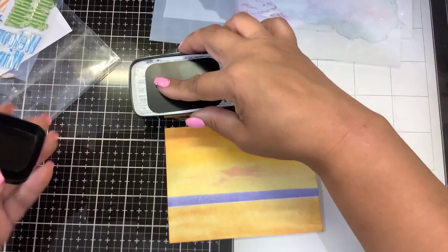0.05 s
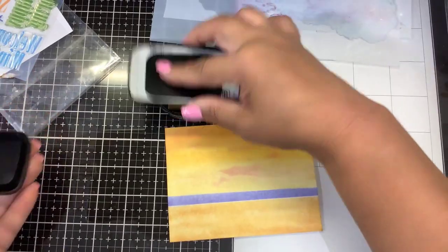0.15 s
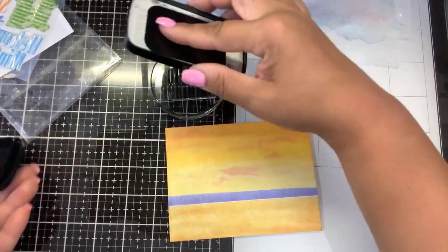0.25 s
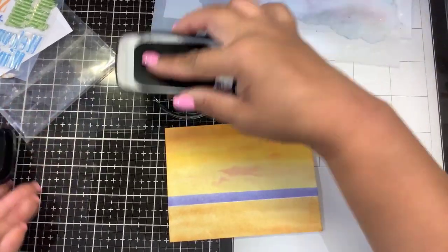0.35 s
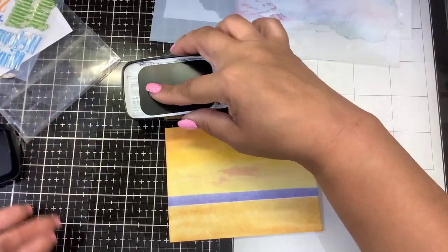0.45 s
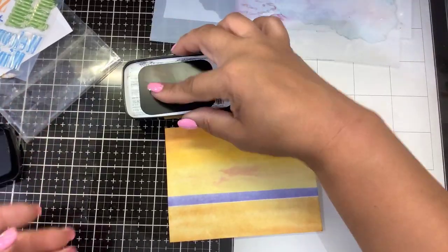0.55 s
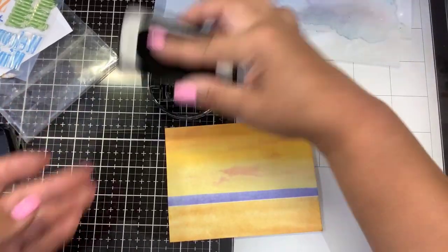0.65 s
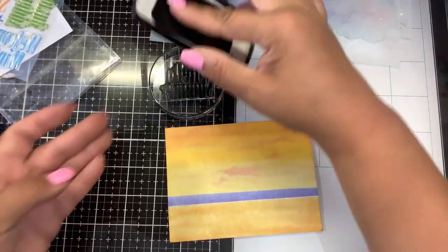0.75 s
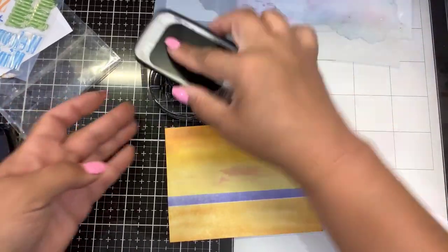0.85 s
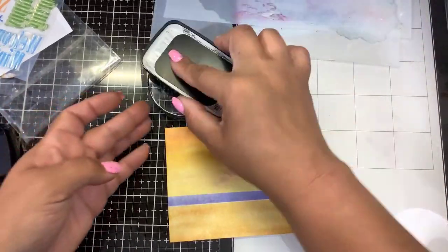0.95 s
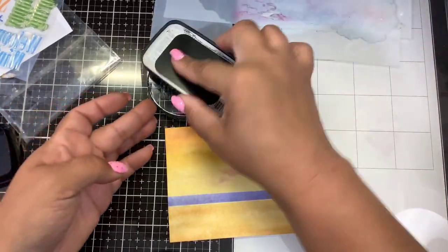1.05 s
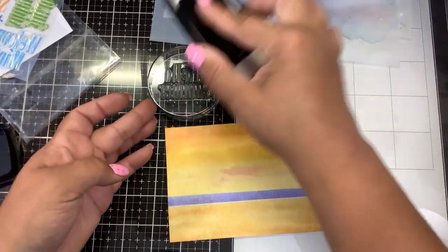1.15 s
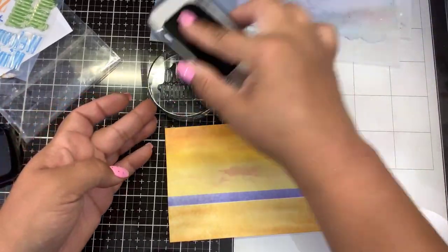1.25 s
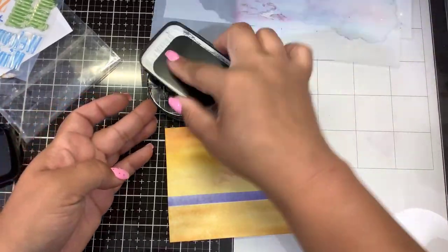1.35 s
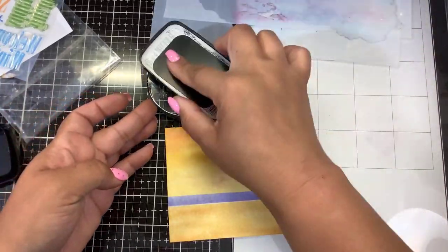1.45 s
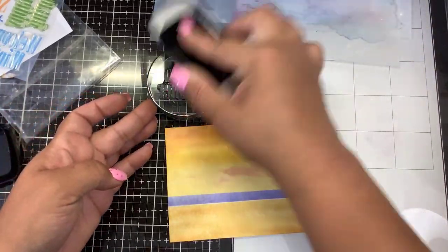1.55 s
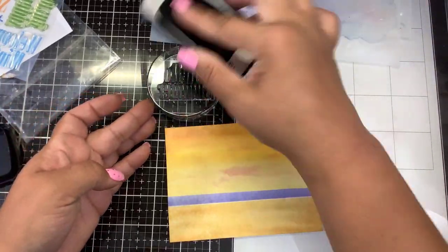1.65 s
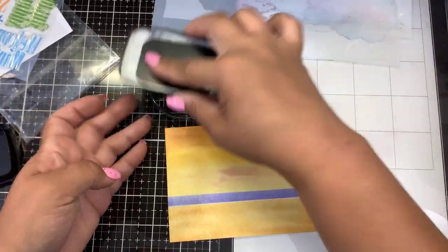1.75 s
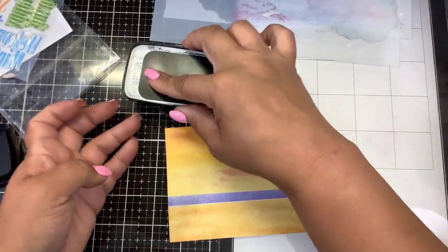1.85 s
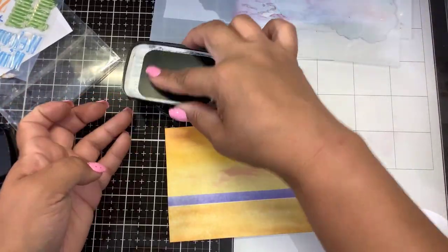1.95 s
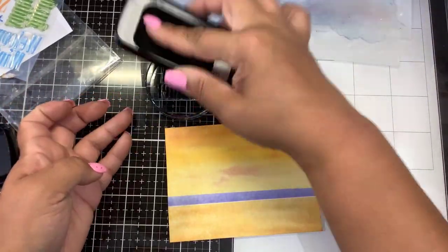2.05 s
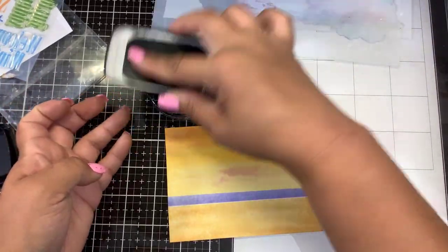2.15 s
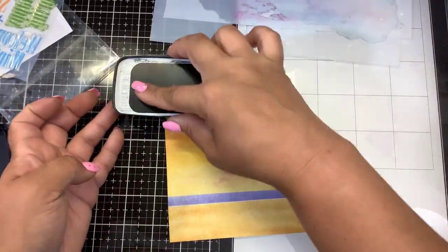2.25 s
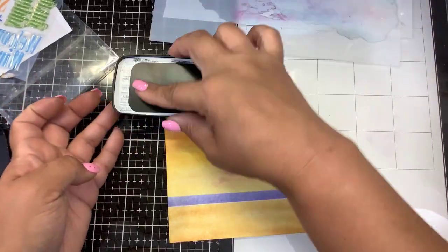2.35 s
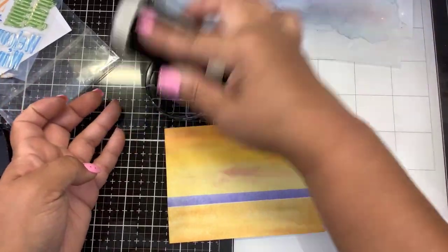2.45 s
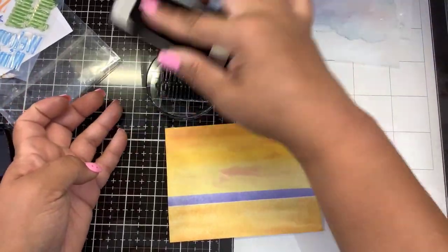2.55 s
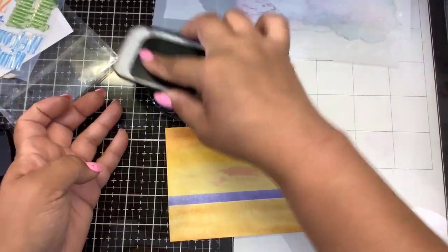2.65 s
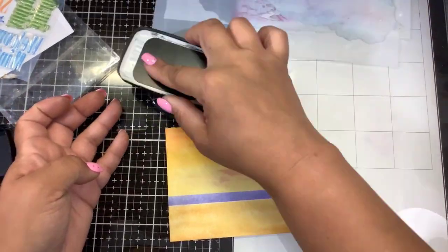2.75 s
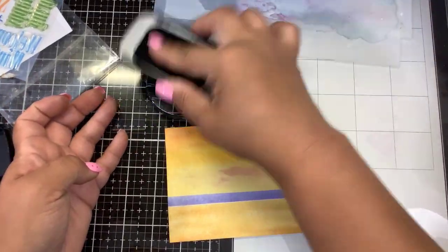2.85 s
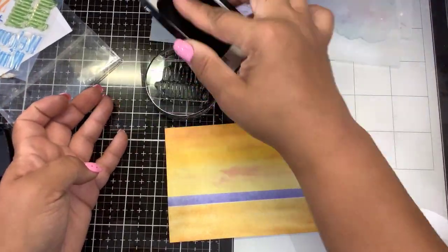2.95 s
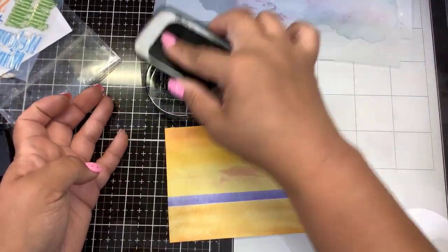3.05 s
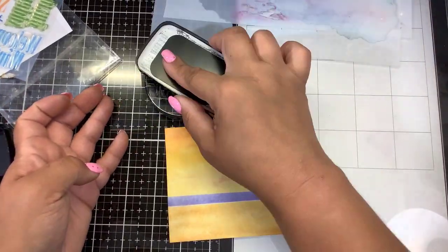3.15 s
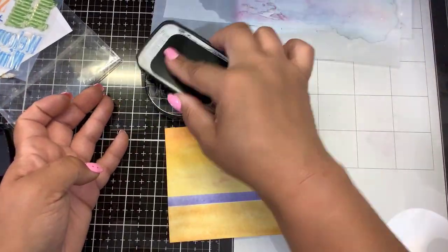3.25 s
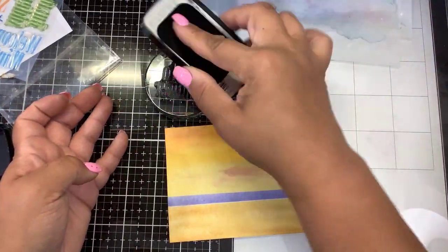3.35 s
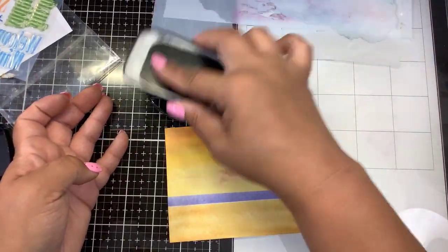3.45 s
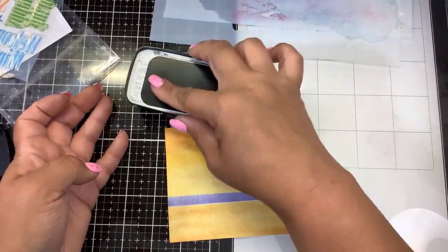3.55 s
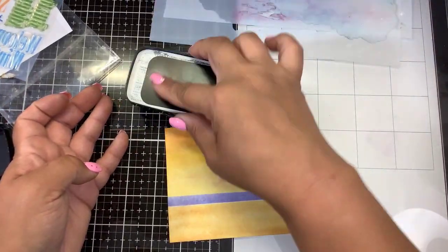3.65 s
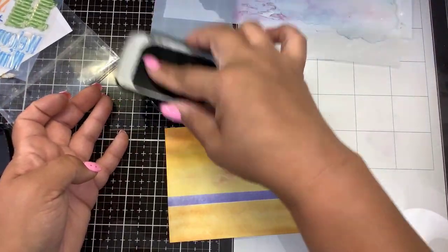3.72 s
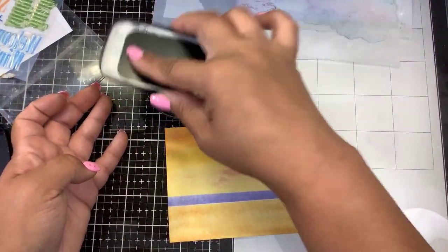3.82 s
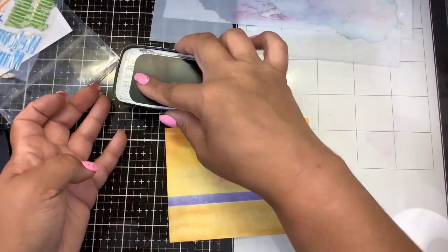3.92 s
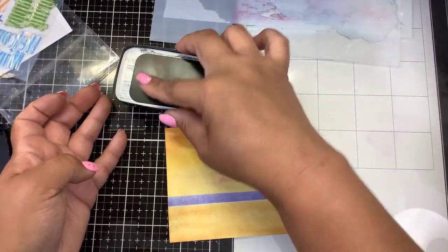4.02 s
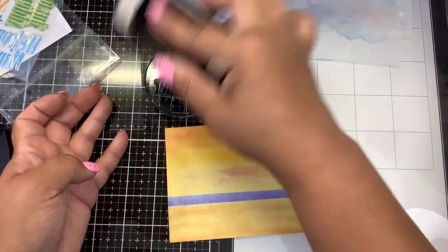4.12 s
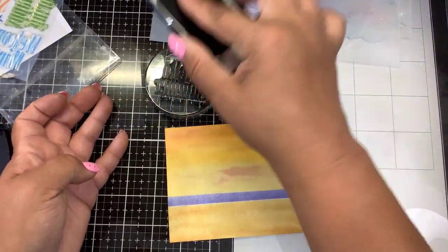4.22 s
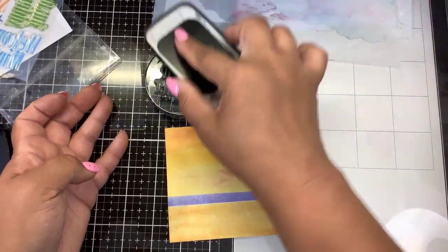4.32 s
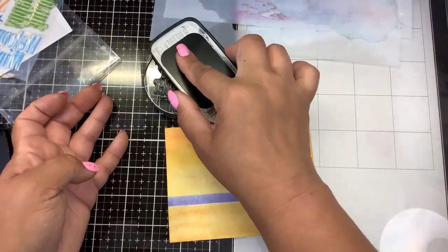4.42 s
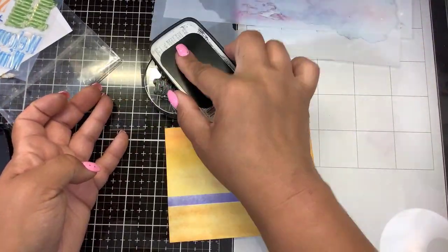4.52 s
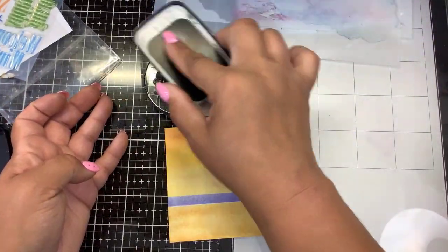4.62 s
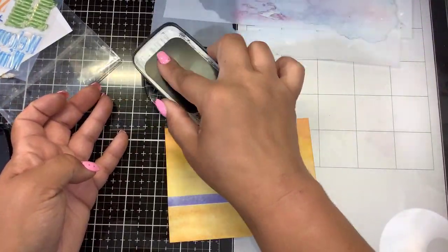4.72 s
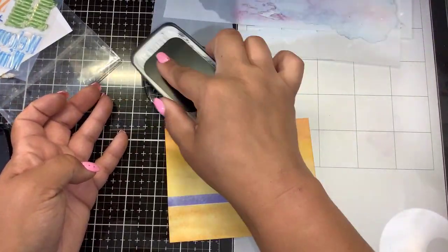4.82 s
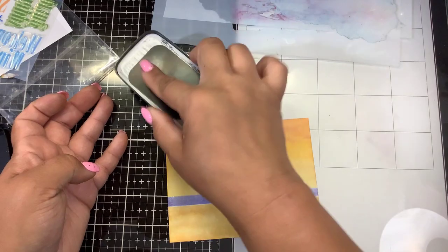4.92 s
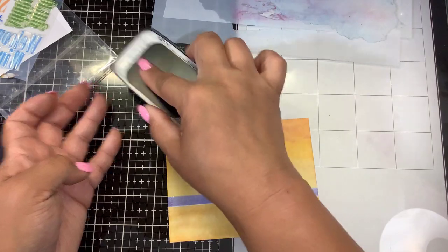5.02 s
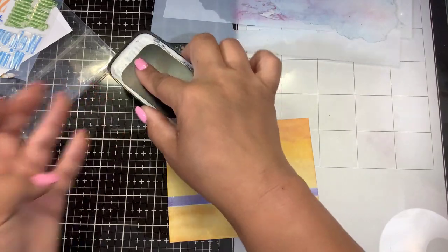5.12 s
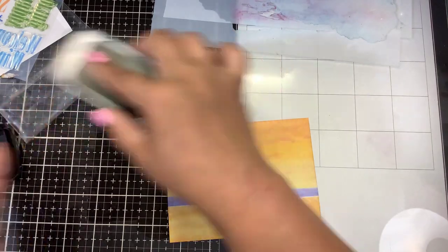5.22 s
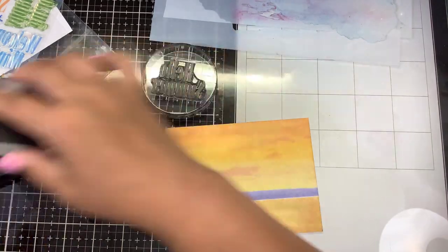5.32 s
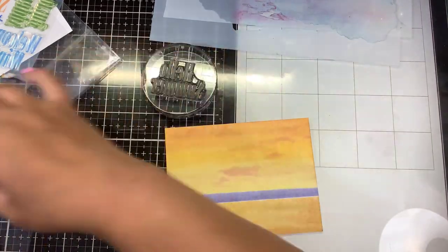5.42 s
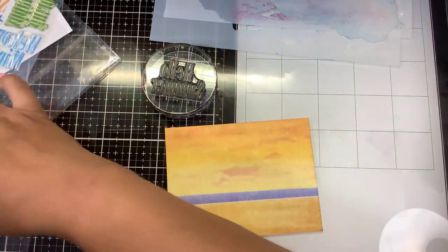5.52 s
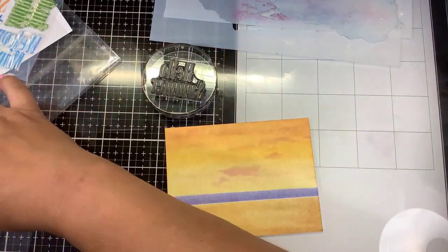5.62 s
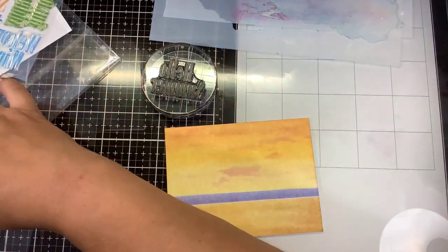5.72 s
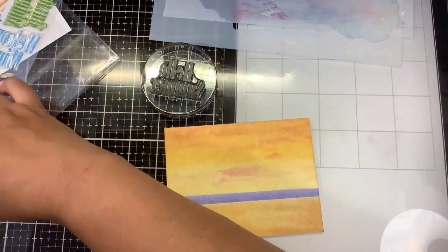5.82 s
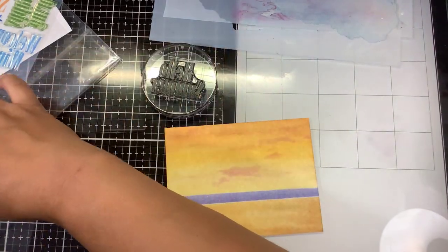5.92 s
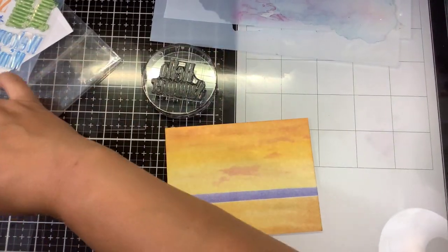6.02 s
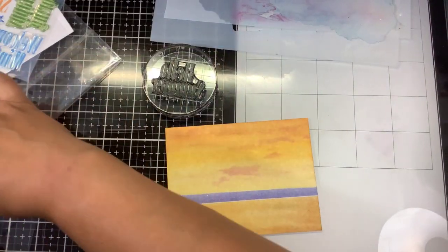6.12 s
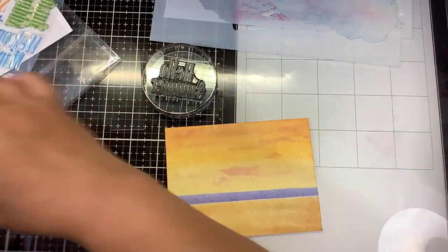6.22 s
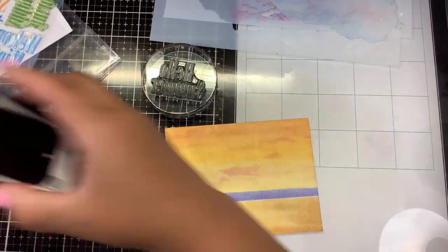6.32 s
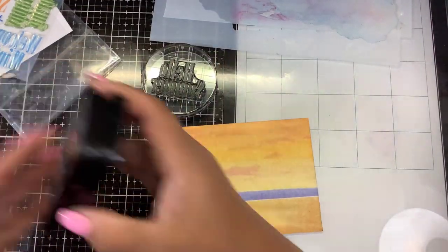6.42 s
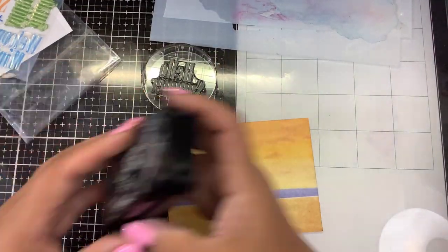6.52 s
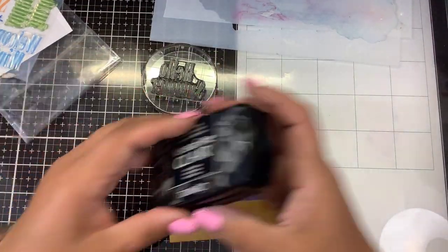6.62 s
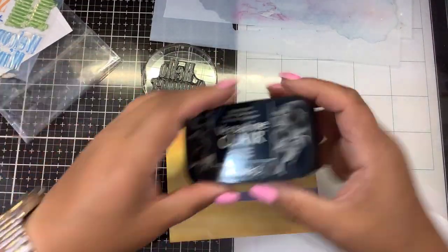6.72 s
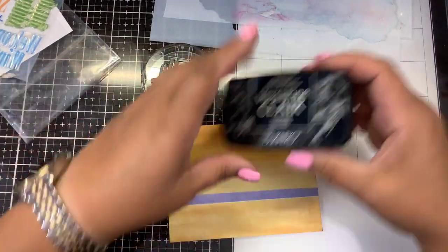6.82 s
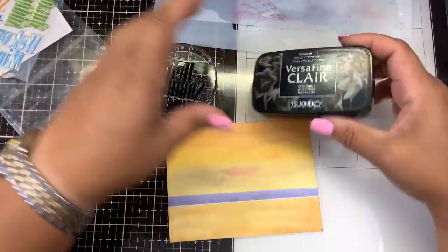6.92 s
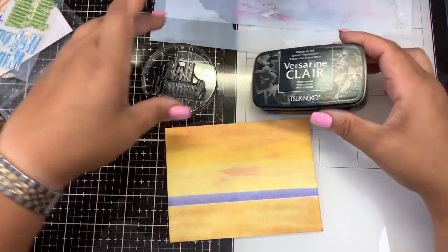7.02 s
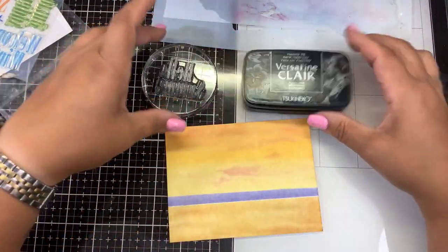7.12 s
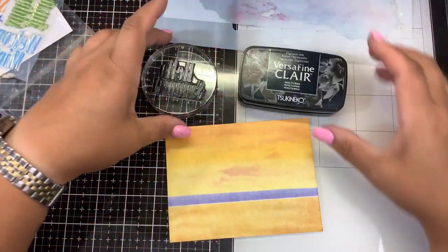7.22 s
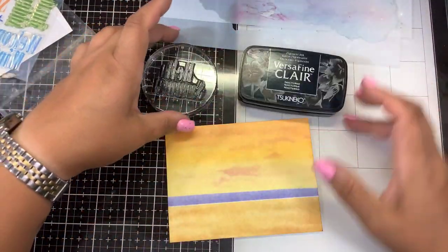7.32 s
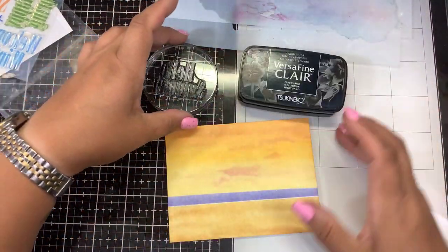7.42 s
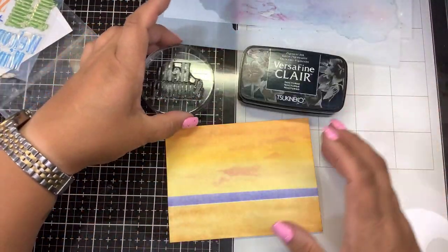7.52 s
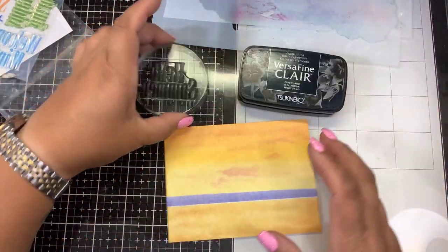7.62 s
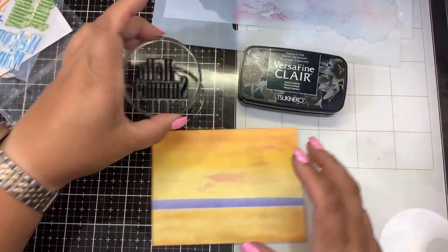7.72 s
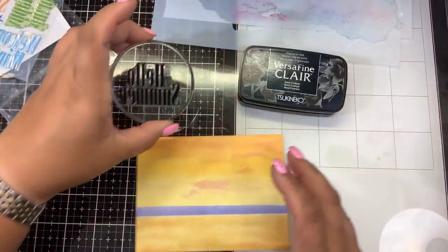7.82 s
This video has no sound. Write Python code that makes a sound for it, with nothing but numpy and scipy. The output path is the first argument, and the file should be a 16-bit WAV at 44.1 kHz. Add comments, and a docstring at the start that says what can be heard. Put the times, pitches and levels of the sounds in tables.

```python
"""A plastic ink pad is dabbed onto a clear stamp on an acrylic block, on a craft table in a small quiet room.
The lid clacks among the first dabs. For five seconds, dab after dab thuds through the table top,
the rim of the case clicks, and the tacky ink peels off as the pad lifts.
Then the lid is picked up, with clicks, knocks and scuffs of hollow plastic.
At seven seconds the closed pad is set down and rattles to rest."""
import sys
import numpy as np
from scipy import signal
from scipy.fft import rfft, irfft, next_fast_len
from scipy.io import wavfile
from scipy.ndimage import uniform_filter1d

SR = 44100
rng = np.random.default_rng(int(sys.argv[2]) if len(sys.argv) > 2 else 0)


def wrap_up_sound(samples):
    """Save the sound to the file named by the first command line argument, as 16-bit audio."""
    columns = np.atleast_2d(samples).T
    # keep every value between -1 and 1, then stretch to whole-number steps
    tamed = np.clip(columns, -1, 1)
    steps = np.round(tamed * 32767).astype(np.int16)
    wavfile.write(sys.argv[1], SR, steps)


N = 346925

# Tone of the room's rumble and hiss. Each row: frequency in Hz, gain in dB.
ROOM_TONE_EQ = [(12, -56), (20, -46.5), (60, -3), (91, -17), (123, -4), (150, -24), (222, -22), (255, -29),
                (310, -29.5), (624, -37.5), (849, -37), (1220, -39), (2530, -41), (3950, -43), (16000, -39)]
# Dabs of the pad on the stamp. Each row: start in seconds, thud level in dB, rim click level in dB,
# time held down in seconds, smack of the lift in dB, fizz of the ink in dB.
DABS = [(0.0, -42.5, -62, .148, -60, -51), (0.467, -33.5, -46, 0.15, -55.5, -52.5),
        (0.959, -32, -46, 0.13, -60, -59), (1.401, -38.5, -61, 0.12, -62.5, -61.5),
        (1.843, -38, -55.5, 0.15, -55, -55), (2.273, -34, -49, .14, -60, -54.5),
        (2.724, -36, -51.5, 0.12, -62, -59), (3.157, -38, -59.5, 0.11, -65.5, -63),
        (3.542, -41.5, -56.5, .163, -55, -54), (3.943, -32, -45, .138, -50, -50.5),
        (4.435, -43, -70, 0.14, -59.5, -63.5), (4.752, -27.5, -38.5, .094, -54.5, -55.5),
        (4.971, -33, -49.5, 0.07, -51.5, -52.5)]
# Modes of the table top, the hollow plastic shell and the closed case.
# Each row: frequency in Hz, relative level in dB, t60 in seconds.
TABLE_MODES = [(51, -2, 0.22), (66.4, -3.5, 0.15), (103.7, -4.5, 0.12), (133.4, -1, 0.17),
               (177.2, 2, 0.085), (212.4, -.5, 0.12), (276, -2.5, .085), (375, -20, .05),
               (429, -12.5, 0.068), (546, -20, 0.045), (624, -22.5, 0.064)]
SHELL_MODES = [(600, -8.5, 0.09), (690, -6.5, 0.065), (1363, -12.5, 0.18), (1835, 2, 0.051),
               (2050, 0.5, 0.046), (2137, -3.5, .06), (2425, 0, 0.07), (2636, 0.5, 0.055), (2680, -5, 0.11),
               (3175, -3, 0.023), (3150, -7.5, 0.06), (5700, -10, 0.078), (6330, -13.5, 0.075),
               (7900, -7.5, 0.075), (9810, -13, .06)]
CASE_MODES = [(387.3, -10, 0.13), (587, -6, 0.06), (665, -4.5, 0.079), (862, -3, 0.06), (1024, -4.5, 0.092),
              (1072, -1.5, .04), (1335, -4, 0.045), (1880, -1, 0.046), (1990, -10, 0.038),
              (2740, -7, 0.026), (3050, -5.5, 0.03)]
# Tone of the crack in a click and in a knock. Each row: frequency in Hz, gain in dB.
CLICK_EQ = [(100, -28.5), (470, -19.5), (660, 0.5), (1050, -3.5), (1550, 2.5), (1950, -3.5), (2800, 3),
            (4300, 0), (7000, -2.5), (12000, -4.5), (16000, -13.5)]
KNOCK_EQ = [(100, -15), (250, -9.5), (500, -2.5), (950, -2.5), (1450, -3.5), (2000, -8), (3000, -7.5),
            (4500, -11.5), (7500, -16), (11000, -12), (16000, -21)]
# Lows, mids and treble of a plastic hit. Each row: lower edge in Hz, upper edge in Hz.
HIT_BANDS = [(300, 1200), (1200, 4000), (4000, 16000)]
# Tone of the block under a peel, and of snapping ink threads. Each row: frequency in Hz, gain in dB.
SMACK_EQ = [(150, -6.5), (350, -15), (600, -4.5), (800, -11), (1050, -8.5), (1380, -1.5), (1850, -15.5),
            (3200, -20.5), (6000, -30)]
FIZZ_EQ = [(1500, -33.5), (3500, -7.5), (5000, -1), (9000, -2), (14000, 2.5), (16000, -2.5)]
# Scuffs of the handled case. Each row: start in seconds, length in seconds, smack in dB, fizz in dB.
SCUFFS = [(0.087, 0.091, -64.5, -59), (5.068, 0.029, -52, -60), (5.119, 0.08, -63.5, -61.5),
          (5.183, 0.036, -59.5, -61), (5.767, 0.033, -58, -58.5), (6.132, 0.024, -54, -57.5),
          (6.404, 0.051, -63, -49)]
# Sharp clicks of case, lid and block.
# Each row: start in seconds, mid level in dB, treble relative to the mids in dB, crack t60 in seconds.
CLICKS = [(0.2972, -18.5, -4, 0.029), (0.3344, -22, -2.5, 0.024), (0.4437, -25, 5.5, 0.04),
          (0.9213, -48.5, 6, 0.024), (1.003, -55.5, -0.5, 0.028), (1.4145, -61.5, 4, 0.027),
          (1.651, -62.5, 9, 0.044), (1.749, -64, 4, .026), (1.9244, -46.5, 0.5, 0.025),
          (2.0635, -74, 7.5, 0.017), (2.3971, -54, 5.5, 0.03), (4.046, -56.5, -3.5, .016),
          (4.77, -56.5, 14, 0.025), (5.11, -46.5, -0.5, 0.031), (5.946, -40.5, 2.5, .025),
          (5.9963, -41, 11.5, .029), (6.492, -67, 15.5, 0.033), (6.771, -68.5, 6.5, 0.051),
          (7.369, -41.5, 9.5, 0.033)]
# Hand or case sets a spot of the table booming. Each row: start in seconds, level in dB, pitch in Hz.
BUMPS = [(.315, -52, 159.8), (1.193, -54.5, 173.5), (1.928, -52, 327), (5.149, -43.5, 212),
         (5.159, -38, 59), (5.176, -39.5, 144.6), (5.964, -41.5, 341), (5.974, -33, 150), (7.021, -34, 427),
         (7.031, -42.5, 184), (7.679, -52.5, 64.3)]
# The case knocks on block and table; the grip tunes its hollow. Each row: start in seconds,
# base level in dB, tilt in dB per octave, pitch of the hollow in Hz, crack t60 in seconds.
KNOCKS = [(.349, -39, -0.5, 694, .04), (.586, -72, -5, 1400, 0.016), (1.191, -64, -9.5, 1446, 0.053),
          (4.7535, -43, -8, 471, 0.026), (5.617, -62, -0.5, 1010, 0.037),
          (5.6238, -43.5, -1.3, 2045, 0.032), (5.655, -57.5, -3, 1980, 0.022), (5.798, -35, -2, 730, 0.02),
          (5.873, -47.5, -5.5, 590, .05), (5.9551, -41, -1.9, 1480, 0.039),
          (5.9609, -33.5, -1.5, 840, 0.026), (7.0199, -24, -0.2, 563, 0.022),
          (7.1822, -21.5, -1.04, 924, 0.036)]
# Hands slide over plastic and paper.
# Each row: start in seconds, length in seconds, level in dB, centre frequency in Hz.
RUBS = [(1.629, 0.3, -74.5, 2730), (2.274, 0.5, -73, 1706), (2.732, 0.024, -58.5, 2590),
        (5.14, 0.03, -49, 643), (5.823, 0.13, -75, 1710), (6.37, .055, -65.5, 1450),
        (6.506, .39, -71.5, 5600), (7.065, 0.13, -68, 2700), (7.552, .27, -74, 1584)]
# The rocking case hums and the table booms under it. Each row: level in dB, pitch in Hz, t60 in seconds.
ROCKING_RINGS = [(-35, 420, 0.23), (-40, 160, 0.5)]

BAND_CENTRES_HZ = np.sqrt(np.prod(HIT_BANDS, axis=1))
ATTACK_S, THUD_S = 0.012, 0.05  # opening spans that set the level of hard and of soft hits


def undb(db):
    """Decibels to gain."""
    return 10 ** (np.asarray(db) / 20)


def seconds(size):
    """Time axis of size samples."""
    return np.arange(size) / SR


def level(x, db, span_s):
    """Scale x so that its first span_s seconds have the given rms level."""
    return x * undb(db) / np.sqrt(np.mean(x[:int(span_s * SR)] ** 2) + 1e-20)


def add(out, start_s, x):
    """Mix x into out at start_s."""
    i = max(int(start_s * SR), 0)
    out[i:i + len(x)] += x[:max(len(out) - i, 0)]


def eq(x, points):
    """Minimum-phase EQ through (Hz, dB) points, so attacks get no pre-ring."""
    size = 2 * next_fast_len(len(x))
    hz, db = np.transpose(points)
    bin_hz = np.maximum(np.arange(size // 2 + 1) * SR / size, 1)
    gain = undb(np.interp(np.log(bin_hz), np.log(hz), db))
    cepstrum = irfft(np.log(gain))
    cepstrum[1:size // 2] *= 2
    cepstrum[size // 2 + 1:] = 0
    return irfft(rfft(x, size) * np.exp(rfft(cepstrum)))[:len(x)]


def band(x, low_hz, high_hz, order=3):
    """Band-pass."""
    edges = [low_hz, min(high_hz, SR / 2 - 1)]
    return signal.sosfilt(signal.butter(order, edges, "band", fs=SR, output="sos"), x)


def fade(t, t60):
    """Exponential decay, 60 dB down at t60 seconds."""
    return np.exp(-np.log(1000) * t / t60)


def room_tone(noise_db=-57.5, hum_hz=120, hum_db=-61.5):
    """The bed under everything: low rumble, faint hiss and mains hum."""
    noise = eq(rng.standard_normal(N), ROOM_TONE_EQ)
    hum = np.sin(2 * np.pi * hum_hz * seconds(N))
    return level(noise, noise_db, N / SR) + level(hum, hum_db, N / SR)


def soft_mode(t, hz, t60, rise_cycles):
    """One mode pushed by a soft contact: it swells, then fades."""
    t = np.maximum(t, 0)
    rise = np.sin(np.pi / 2 * np.minimum(t * hz / rise_cycles, 1)) ** 2
    return rise * np.sin(2 * np.pi * hz * t) * fade(t, t60)


def thud(db, tilt_db_per_oct, lag_s=0.012, scatter_db=3.0):
    """A padded blow rings the table; slow bending waves bring the low modes a little later."""
    t = seconds(16384)
    ring = 0
    for hz, mode_db, t60 in TABLE_MODES:
        spot, detune = rng.standard_normal(2)
        gain = undb(mode_db + tilt_db_per_oct * np.log2(hz / 150) + scatter_db * spot)
        arrival_s = lag_s / (1 + (hz / 180) ** 2)
        ring += gain * soft_mode(t - arrival_s, hz * (1 + 0.025 * detune), t60, rise_cycles=1.32)
    return level(ring, db, THUD_S)


def crackle(size, per_s=3500, spread_db=0.0):
    """Dense tiny snaps at random times, their levels scattered by spread_db."""
    snaps = rng.random(size) < per_s / SR
    return snaps * rng.choice([-1, 1], size) * undb(spread_db * rng.standard_normal(size))


def crunch(db, t60=0.16):
    """The wet pad squashes into the ridges of the stamp."""
    t = seconds(8192)
    squash = crackle(len(t)) * fade(t, t60)
    return level(eq(squash, KNOCK_EQ), db, 2 * ATTACK_S)


def contact_hardness(hit, band_dbs):
    """Hard or soft contact: two EQ passes pull the attack toward its low, mid and treble levels."""
    for _ in range(2):
        attack = hit[:int(ATTACK_S * SR)]
        powers = [np.mean(band(attack, low, high, order=2) ** 2) for low, high in HIT_BANDS]
        gains_db = band_dbs - 10 * np.log10(powers)
        hit = eq(hit, list(zip(BAND_CENTRES_HZ, gains_db)))
    return hit


def plastic_hit(band_dbs, t60, modes, crack_eq, hollow_hz, hollow_db, ring_db, tail_db, tail_t60):
    """Many short modes blur into a crack, boosted by the hollow of the case; longer ones ring on."""
    t = seconds(12288)
    envelope = fade(t, t60) + undb(tail_db) * fade(t, tail_t60)
    crack = eq(rng.standard_normal(len(t)) * envelope, crack_eq)
    crack += undb(hollow_db) * band(crack, hollow_hz / 1.08, hollow_hz * 1.08, order=1)
    ring = 0
    for hz, db, mode_t60 in modes:
        detune, spot = rng.standard_normal(2)
        tone = rng.choice([-1, 1]) * np.sin(2 * np.pi * hz * (1 + 0.005 * detune) * t)
        ring += undb(db + 2 * spot) * tone * fade(t, mode_t60)
    hit = level(crack, 0, ATTACK_S) + level(ring, ring_db, ATTACK_S)
    return contact_hardness(hit, band_dbs)


def click(db, treble_db, t60, usual_db=-46):
    """An edge of the shell snaps; loud, bright clicks have a short contact and so less low end."""
    low_db = db - 0.29 * max(db - usual_db, 0) - 0.2 * max(treble_db, 0)
    return plastic_hit([low_db, db, db + treble_db], t60, SHELL_MODES, CLICK_EQ,
                       hollow_hz=2210, hollow_db=-0.5, ring_db=-8.5, tail_db=-25.5, tail_t60=0.1)


def peel(length_s, smack_db, fizz_db, release_t60=0.045, smack_rise_s=0.079):
    """Sticky contacts let go in a growing fizz, then part with a smack that sounds the block."""
    t = seconds(8192)
    parting_s = 0.71 * length_s
    pull = np.minimum(t / parting_s, 1)
    release = fade(np.maximum(t - parting_s, 0), release_t60)
    fizz = eq(crackle(len(t)) * pull * release, FIZZ_EQ)
    surge = fade(np.maximum(parting_s - t, 0), smack_rise_s)
    snaps = crackle(len(t), per_s=1300, spread_db=5.0)
    smack = eq(snaps * pull * surge * release, SMACK_EQ)
    return level(smack, smack_db, length_s) + level(fizz, fizz_db, length_s)


def dabbing(usual_thud_db=-35.5, usual_smack_db=-58, usual_peel_s=0.044):
    """Each dab thuds, crunches, clicks and peels off; a harder one is brighter and crunches more."""
    out = np.zeros(N)
    for start_s, db, rim_db, held_s, smack_db, fizz_db in DABS:
        force_db = db - usual_thud_db
        add(out, start_s, thud(db, tilt_db_per_oct=0.6 + 0.36 * force_db))
        add(out, start_s, crunch(db=-57.5 + 0.74 * force_db))
        add(out, start_s, click(rim_db, treble_db=-5 + 0.7 * force_db, t60=0.028))
        # A quick lift smacks louder and is over sooner: 8 dB more halves the length.
        peel_s = usual_peel_s * 2 ** ((usual_smack_db - smack_db) / 8)
        add(out, start_s + held_s, peel(peel_s, smack_db, fizz_db))
    return out


def boom(db, hz, t60, blur_db=-7):
    """One dominant low mode in a blur of its neighbours."""
    t = seconds(16384)
    blur = band(rng.standard_normal(len(t)) * fade(t, t60), hz / 2, hz * 1.2)
    tone = soft_mode(t, hz, t60, rise_cycles=1.0)
    return level(level(tone, 0, THUD_S) + level(blur, blur_db, THUD_S), db, THUD_S)


def knock(db, tilt_db_per_oct, hollow_hz, t60):
    """The flat of the case meets block or table; the mids gain as its hollow rises into them."""
    low_db, mid_db, treble_db = db + tilt_db_per_oct * np.log2(BAND_CENTRES_HZ / BAND_CENTRES_HZ[1])
    mid_db += 5.5 * np.log2(hollow_hz / 600)
    return plastic_hit([low_db, mid_db, treble_db], t60, CASE_MODES, KNOCK_EQ,
                       hollow_hz, hollow_db=6.5, ring_db=-6.5, tail_db=-29, tail_t60=0.11)


def rub(length_s, db, hz, uneven_db=-0.5):
    """Skin slides with an uneven grip, catching in tiny slips."""
    size = int(length_s * SR)
    grip = level(uniform_filter1d(rng.standard_normal(size), size=900), 0, length_s)
    slips = band(crackle(size, per_s=1000, spread_db=5.5), hz / 1.35, hz * 1.35, order=2)
    return level(slips * undb(uneven_db * grip) * signal.windows.tukey(size, 0.3), db, length_s)


def handling():
    """Hands move case and lid about: clicks, knocks, table booms, sticky scuffs and rubs."""
    out = np.zeros(N)
    for start_s, db, treble_db, t60 in CLICKS:
        add(out, start_s, click(db, treble_db, t60))
    for start_s, db, tilt_db_per_oct, hollow_hz, t60 in KNOCKS:
        add(out, start_s, knock(db, tilt_db_per_oct, hollow_hz, t60))
    for start_s, db, hz in BUMPS:
        add(out, start_s, boom(db, hz, t60=0.31 / (1 + (hz / 180) ** 2)))  # higher booms die sooner
    for start_s, length_s, smack_db, fizz_db in SCUFFS:
        add(out, start_s, peel(length_s, smack_db, fizz_db))
    for start_s, length_s, db, hz in RUBS:
        add(out, start_s, rub(length_s, db, hz))
    return out


def rocking(start_s=7.2245, first_swing_s=0.036, shrink=0.61, corner_lag_s=0.005):
    """After the last knock the case rocks from edge to edge, ever faster, and settles."""
    out = np.zeros(N)
    last_knock_s = KNOCKS[-1][0]
    for db, hz, t60 in ROCKING_RINGS:
        add(out, last_knock_s + 1 / hz, boom(db, hz, t60))
    landing_s = start_s
    for swing in range(4):
        for lag_s in (0, corner_lag_s):  # one corner lands, then the next
            hollow_hz = 945 * 2 ** (0.29 * rng.uniform(-1.4, 1))
            tap = knock(db=-37.5 - 0.6 * swing, tilt_db_per_oct=-2.5, hollow_hz=hollow_hz, t60=0.064)
            add(out, landing_s + lag_s, tap)
        landing_s += first_swing_s * shrink ** swing
    return out


def room_reverb(x, wet_db=-17, low_t60=0.13, high_t60=0.11):
    """Short, soft reverberation of a furnished room."""
    t = seconds(16384)
    low, high = rng.standard_normal((2, len(t)))
    tail = band(low, 180, 2300, order=1) * fade(t, low_t60)
    tail += band(high, 3000, 13000, order=1) * fade(t, high_t60)
    tail *= np.minimum(t / 0.01, 1)
    tail /= np.sqrt(np.sum(tail ** 2))
    return x + undb(wet_db) * signal.fftconvolve(x, tail)[:N]


def scene():
    """The mono mix: close-up action on the table, a touch of reverb and the room tone."""
    action = dabbing() + handling() + rocking()
    return (room_reverb(action) + room_tone())[None]


def record(dry):
    """A steep low-pass trims the air above 16.2 kHz."""
    return signal.sosfilt(signal.ellip(8, 0.2, 70, 16200, fs=SR, output="sos"), dry)


dry = scene()
out = record(dry)
wrap_up_sound(out)
```